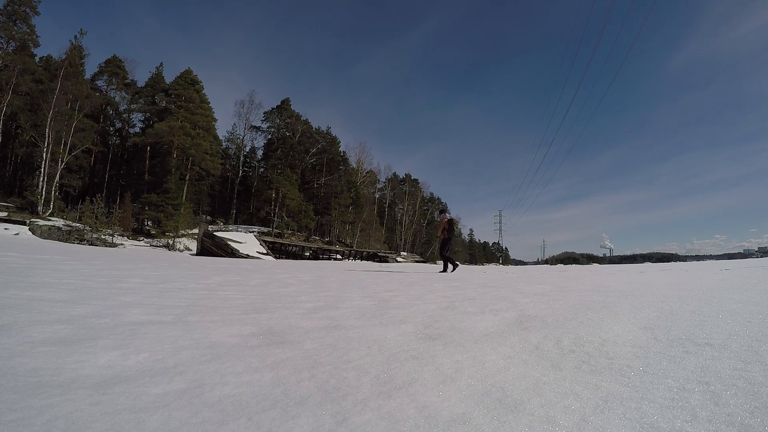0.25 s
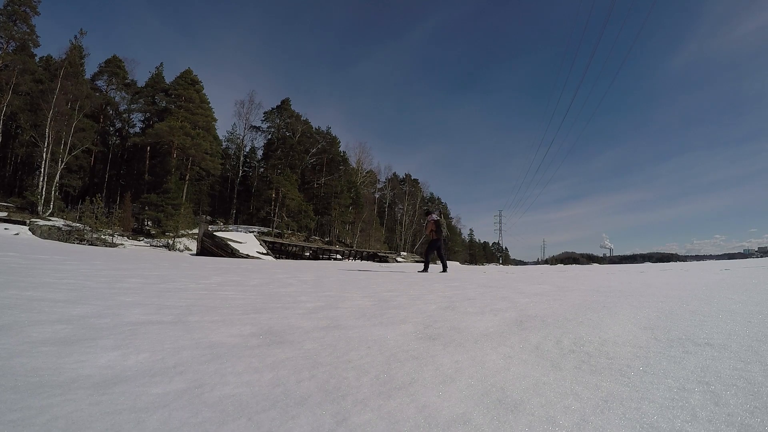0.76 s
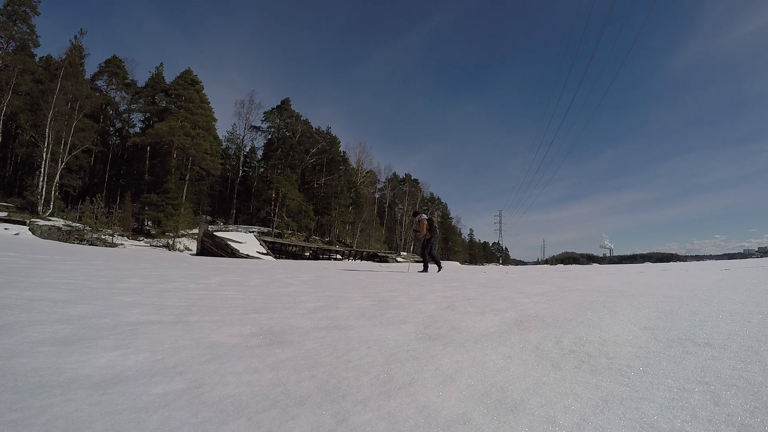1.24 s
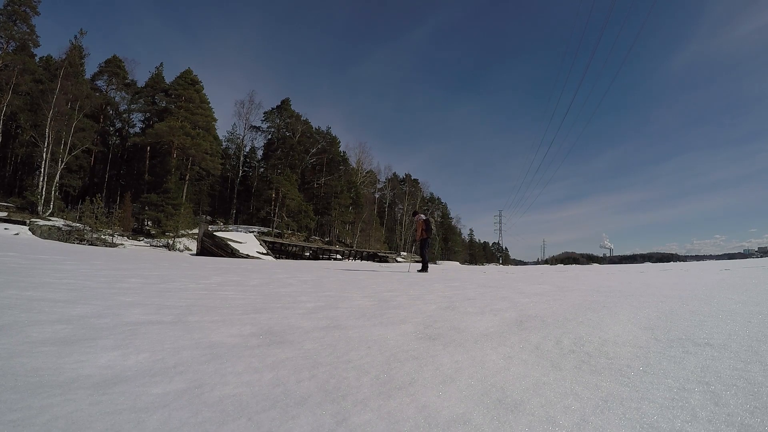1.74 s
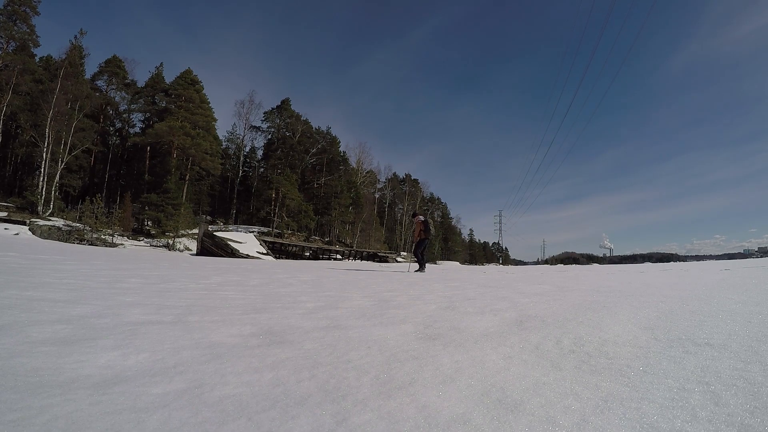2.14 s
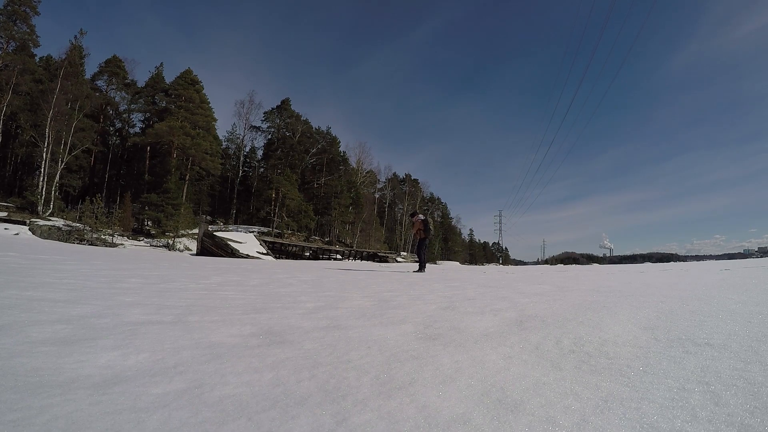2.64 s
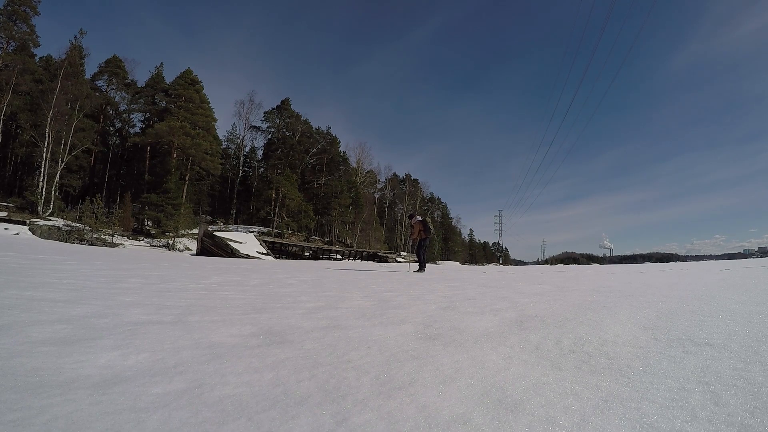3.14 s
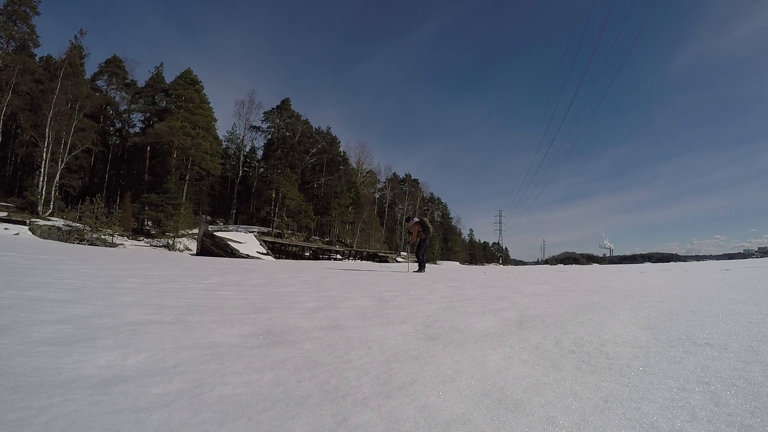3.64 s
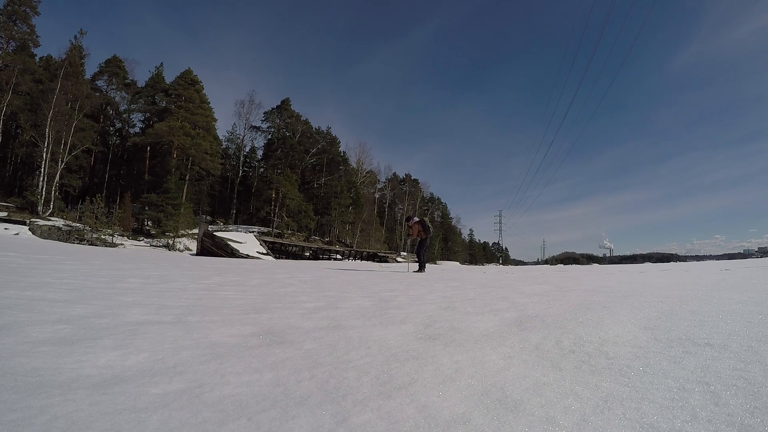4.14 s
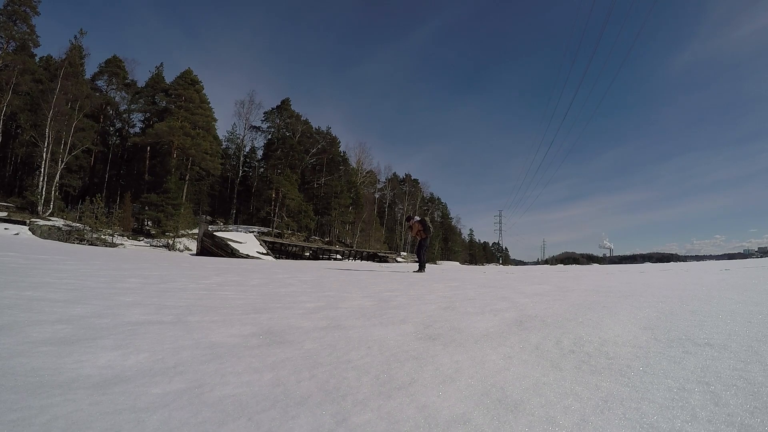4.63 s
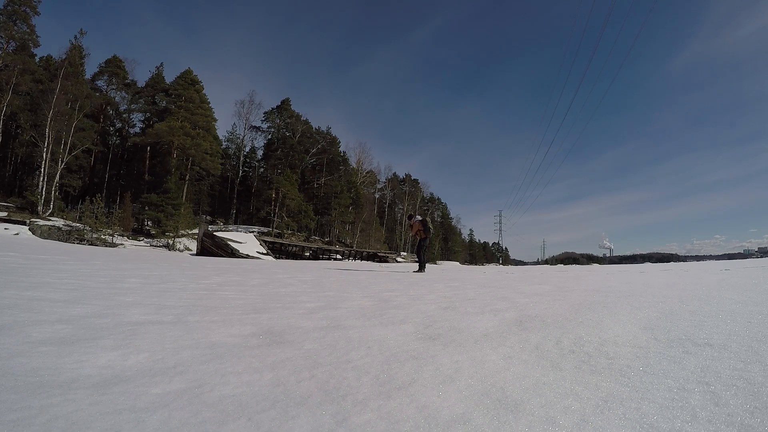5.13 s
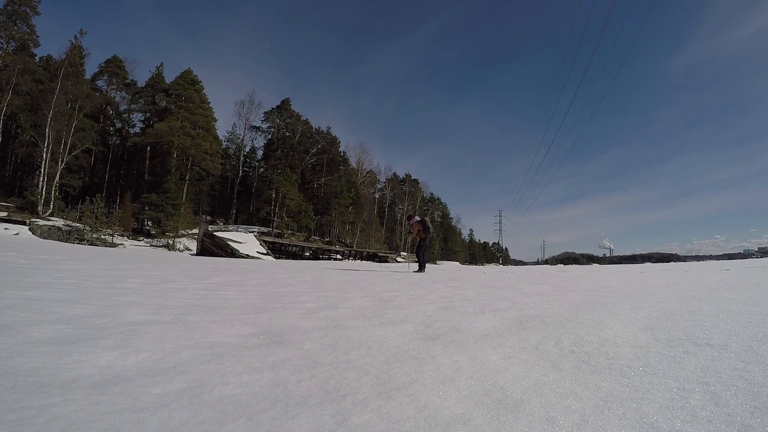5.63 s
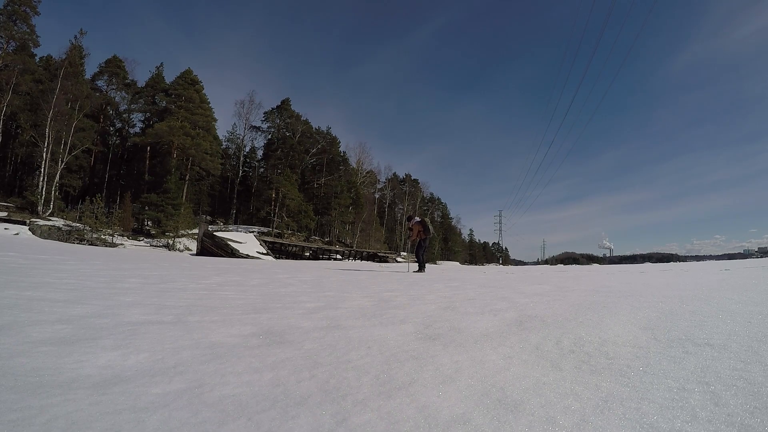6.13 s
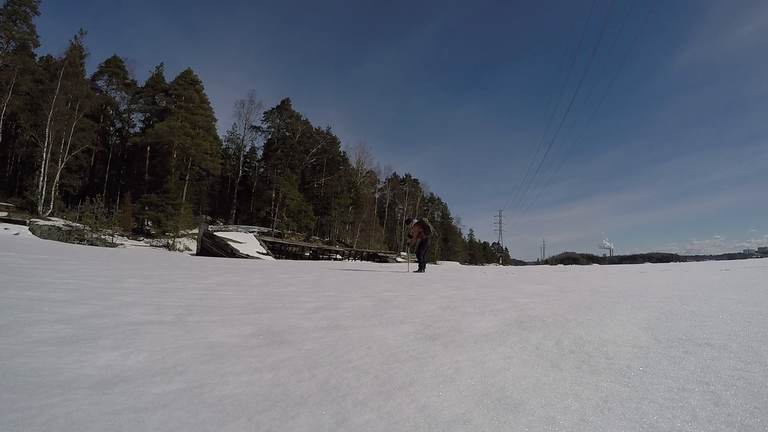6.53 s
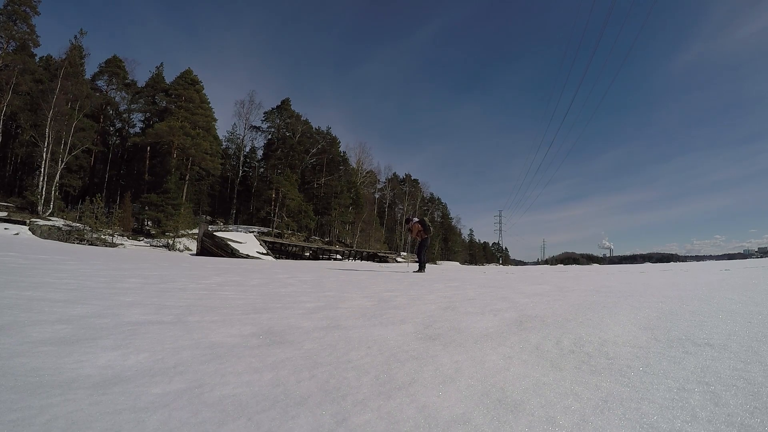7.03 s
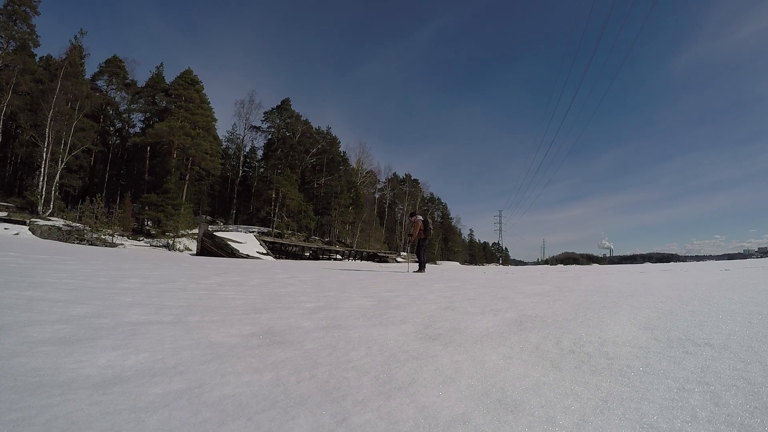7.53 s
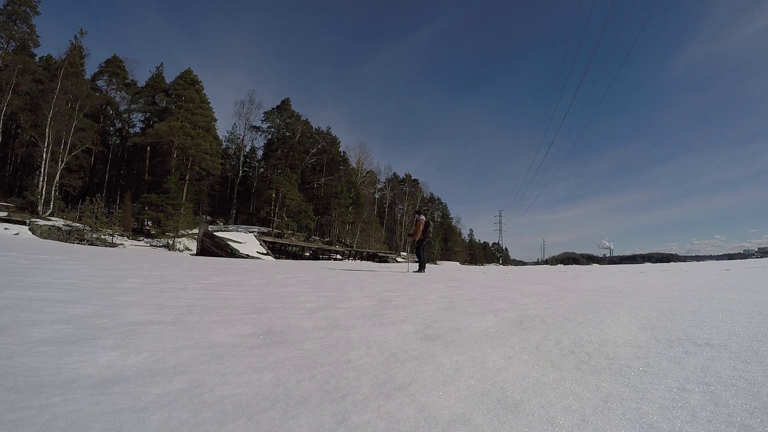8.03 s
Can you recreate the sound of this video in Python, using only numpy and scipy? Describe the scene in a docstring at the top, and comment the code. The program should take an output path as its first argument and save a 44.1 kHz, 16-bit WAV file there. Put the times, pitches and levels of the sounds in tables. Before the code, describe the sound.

A steel chisel cracks lake ice once, then in a regular run of eight bright chops with low thumps and soft echoes from forest and shore.

```python
"""On a frozen lake, boots step softly on snowy ice over faint wind and the thin hiss of the microphone.
Some way off, straight ahead, a long steel chisel strikes one blow; after two more steps comes a run of eight chops.
Each chop cracks crust, then hard ice: bursts of tiny snaps ring steel and ice, and a bending wave falls in pitch.
The shore and the forest return it as smeared echoes. A deep hum, a climbing sine, passes behind the early chops.
Near the end wind and hiss grow louder together; only the hiss is wide, all else is alike in both channels."""
import sys
import numpy as np
from scipy import signal
from scipy.fft import rfft, irfft, next_fast_len
from scipy.io import wavfile
from scipy.ndimage import uniform_filter1d, map_coordinates

SR = 44100
rng = np.random.default_rng(int(sys.argv[2]) if len(sys.argv) > 2 else 0)


def pcm_store(signal):
    """Save signal as 16-bit PCM."""
    levels = np.round(np.clip(np.atleast_2d(signal), -1, 1) * 32767)
    wavfile.write(sys.argv[1], SR, levels.astype(np.int16).T)


N = 364707
TIME = np.arange(N) / SR  # seconds
LEAD_S = 0.05  # from the start of a fracture burst to its height
TOP_HZ = 15300  # band limit


def amp(db):
    """Decibels to gain."""
    return 10 ** (np.asarray(db) / 20)


def unit(x):
    """Scale to rms 1."""
    return x / np.sqrt(np.mean(x ** 2) + 1e-20)


def along(points, hz):
    """(Hz, value) points joined by straight lines on a log frequency axis."""
    f, value = np.transpose(points)
    return np.interp(np.log(hz + 1), np.log(f + 1), value)


def wobble(rate):
    """A smooth random curve with rate knots a second."""
    knots = rng.standard_normal(int(N * rate / SR) + 4)
    return map_coordinates(knots, [TIME * rate])


def filtered(x, response):
    """x shaped by a response given as a function of frequency."""
    n = x.shape[-1]
    size = next_fast_len(2 * n)
    spectrum = rfft(x, size) * response(np.fft.rfftfreq(size, 1 / SR))
    return irfft(spectrum, size)[..., :n]


def causal(gain):
    """The minimum-phase response with this gain, which rings only after its cause."""
    cepstrum = irfft(np.log(np.maximum(gain, 1e-6)))
    half = len(cepstrum) // 2
    cepstrum[1:half] *= 2
    cepstrum[half + 1:] = 0
    return np.exp(rfft(cepstrum))


def resonances(modes, f):
    """Summed response of (Hz, width Hz, dB) resonances with alternating signs."""
    total = 0
    for k, (centre, width, db) in enumerate(modes):
        damping = 1j * f * width
        total = total + (-1) ** k * amp(db) * damping / (centre * centre - f * f + damping)
    return total


def noise(spectrum):
    """Steady noise of rms 1 coloured by (Hz, dB) points."""
    return unit(filtered(rng.standard_normal(N), lambda f: amp(along(spectrum, f))))


def add(track, s, x):
    """Mix x into track from time s in seconds."""
    i = max(round(s * SR), 0)
    track[i:i + len(x)] += x[:N - i]


def fracture(rise, decay, colour, grain_db=5.0, lead_in_db=-28, lead_in=0.01, even_hz=900):
    """A brief swarm of tiny snaps in the given colour: rms 1 at its height, LEAD_S in; times in seconds."""
    size = SR // 5
    t, f = np.arange(size) / SR - LEAD_S, np.fft.rfftfreq(size, 1 / SR)
    swarm = np.exp(-np.abs(t) / np.where(t < 0, rise, decay))
    # a faint build-up leads into each burst
    swarm += amp(lead_in_db) * np.exp(-np.abs(t) / lead_in) * (t < 0)
    grain = amp(grain_db * rng.standard_normal(size))
    snaps = rfft(swarm * rng.standard_normal(size) * grain)
    # the snaps share their energy evenly over broad bands, so the struck body sets the colour
    band_bins = max(int(even_hz / f[1]), 1)
    broad = np.sqrt(np.abs(uniform_filter1d(np.abs(snaps) ** 2, band_bins)))
    burst = irfft(snaps * causal(colour(f) * broad.mean() / broad))
    return burst * np.linalg.norm(swarm) / np.linalg.norm(burst)


# The chops, two bites each: through the crust, then into the hard ice. Each row: time in seconds,
# crack level in dB, decay in seconds, brightness in dB per octave, lower ring in Hz, upper ring in Hz, boom level in dB.
BITES = [(1.1681, -23, 0.0042, 2.5, 1320, 4770, -28), (1.1839, -28, 0.0068, -1, 1210, 3700, -23.5),
         (2.9751, -15.5, 0.0023, 1, 1580, 3630, -30.5), (2.990, -26, 0.003, 1, 1490, 3660, -18),
         (3.6403, -23, 0.0042, 2.5, 2280, 3820, -29), (3.6591, -23.5, 0.0033, 1.5, 2840, 3730, -17),
         (4.2807, -20, 0.0035, -0.5, 1220, 2430, -31.5), (4.2952, -21.5, 0.0033, 0.5, 1260, 4250, -21),
         (4.851, -25, 0.0056, .5, 2720, 4800, -31.5), (4.866, -21.5, 0.0045, -0.5, 1480, 2830, -22),
         (5.447, -26, 0.0034, 0, 2180, 2540, -50), (5.4636, -18, 0.0022, -1, 2140, 4000, -13),
         (6.0127, -21.5, 0.0045, 1, 2300, 3300, -36), (6.031, -23.5, 0.0037, 0.5, 2800, 4260, -15),
         (6.606, -43, .02, 2.5, 3400, 4330, -48), (6.628, -14, 0.0016, -2, 826, 1670, -10),
         (7.219, -39.5, 0.016, 2.5, 3230, 5000, -44), (7.235, -19, 0.005, 2.5, 2950, 4820, -9)]
# Ringing of blade and ice. Each row: resonance in Hz, width in Hz, middle level in dB.
BLADE = [(731, 47, -1.5), (1021, 66, 4.5), (1433, 69, -2), (2220, 130, 1.5), (2575, 335, 3.5),
         (3880, 420, -1), (4730, 750, -4.5), (5750, 330, -5.5), (6840, 360, -6.5), (8080, 320, -22),
         (9400, 170, -16), (11080, 120, -5.5), (13100, 91, -9)]
# Colour of shattering ice. Each row: frequency in Hz, relative level in dB per Hz.
SHATTER = [(150, -72), (350, -27), (580, -5), (900, -9.5), (1600, -0.5), (1950, -1.5), (2450, -11),
           (3200, -5), (4100, -15), (6200, -17.5), (8500, -23.5), (10500, -14), (13000, -27), (15500, -47)]
RISE_SHARE = 0.19  # a crack's rise over its decay
# crumbling round each crack: level relative to it, build-up and decay
GRIT_DB, GRIT_RISE_S, GRIT_DECAY_S = -21.5, 0.0048, 0.0053


def cracks(lift_db, ring_db, ring_octaves=0.13, scatter_db=2.5):
    """Each bite rings steel and ice amid crumbling grit; two rings per bite stand out by lift_db."""
    out = np.zeros(N)
    for s, db, decay, bright, lower_hz, upper_hz, _ in BITES:
        modes = [(hz, width, level + scatter_db * rng.standard_normal()) for hz, width, level in BLADE]

        def colour(f):
            def octaves(hz):
                return np.log2(np.maximum(f, 400) / hz)

            rings = sum(np.exp(-(octaves(hz) / ring_octaves) ** 2 / 2) for hz in (lower_hz, upper_hz))
            ringing = amp(ring_db) * np.abs(resonances(modes, f))
            body = np.hypot(amp(along(SHATTER, f)), ringing)
            return body * amp(bright * octaves(upper_hz) + lift_db * rings)

        crack = fracture(RISE_SHARE * decay, decay, colour)
        grit = fracture(GRIT_RISE_S, GRIT_DECAY_S, colour)
        add(out, s - LEAD_S, amp(db) * crack)
        add(out, s - LEAD_S, amp(db + GRIT_DB) * grit)
    return out


# the wave in the ice sets in this long before the crack, and crests this long after setting in
BOOM_AHEAD_S, BOOM_CREST_S = 0.01882, 0.015


def booms(extra_hz=500, coupled_hz=89, glide=0.00335, rise=0.0085, fade=0.01):
    """A bending wave runs ahead, highs first, so its pitch falls to the note that keeps pace with sound in air."""
    out, t = np.zeros(N), np.arange(SR // 10) / SR
    # the pitch starts extra_hz above the coupled note
    cycles = coupled_hz * t + extra_hz * glide * (1 - np.exp(-t / glide))
    swelling = np.exp(-((t - BOOM_CREST_S) / np.where(t < BOOM_CREST_S, rise, fade)) ** 2)
    onset = 1 - np.exp(-t / 0.00024)
    wave = -swelling * onset * np.cos(2 * np.pi * cycles)
    for s, *_, boom_db in BITES:
        add(out, s - BOOM_AHEAD_S, amp(boom_db) * wave)
    return out


# Dull knocks as the blade is stopped, one a chop. Each row: time in seconds, strength in dB, pitch in Hz.
KNOCKS = [(1.1692, -15.5, 130), (2.976, -20.5, 224), (3.645, -14.5, 217), (4.283, -38, 170),
          (4.856, -22, 285), (5.465, -25, 197), (6.016, -18.5, 238), (6.6282, -7.5, 204), (7.24, -10, 204)]
# Colour of the low crunch. Each row: frequency in Hz, relative level in dB per Hz.
THUD = [(60, -24), (150, 11), (260, 1.5), (450, -3), (700, -22), (1500, -65), (4000, -79)]
CRUNCH_DB = -35  # the same with every knock


def knocks(t60=0.033, attack=0.0043, crunch_rise=0.0034, crunch_decay=0.0096):
    """The stopped blade thumps the ice round the hole for a few cycles and crushes it with a low crunch."""
    out, t = np.zeros(N), np.arange(SR // 10) / SR
    for s, db, hz in KNOCKS:
        envelope = amp(db - 60 * t / t60) * (1 - np.exp(-t / attack))
        crunch = fracture(crunch_rise, crunch_decay, lambda f: amp(along(THUD, f)))
        add(out, s, -envelope * np.sin(2 * np.pi * hz * t))
        add(out, s - LEAD_S, amp(CRUNCH_DB) * crunch)
    return out


CHIRP_DB = -27  # relative to the first crack of the chop


def chirps(ahead=0.0205, start_hz=560, glide=0.0055, fade=0.0095):
    """The first touch of each chop sends a faint falling chirp through the sheet, just ahead of the boom."""
    out, t = np.zeros(N), np.arange(SR // 20) / SR
    cycles = start_hz * glide * (1 - np.exp(-t / glide))
    chirp = np.sin(2 * np.pi * cycles) * np.exp(-(t / fade) ** 2)
    for s, db, *_ in BITES[::2]:
        add(out, s - ahead, amp(db + CHIRP_DB) * chirp)
    return out


# Chips ticking on the crust. Each row: time in seconds, level in dB, decay in seconds.
CHIPS = [(0.699, -51, 0.0015), (1.249, -48.5, .003), (3.0094, -33.5, .0006), (3.679, -35.5, .0009),
         (4.316, -37.5, .0012), (4.3272, -43, .0009), (4.888, -33.5, 0.00063), (5.517, -44, .001),
         (6.062, -39.5, 0.0012), (6.66, -45, .0008), (7.343, -46.5, 0.014)]
# Colour of a chip. Each row: frequency in Hz, relative level in dB per Hz.
CHIP = [(300, -0.5), (1200, -0.5), (2500, -0.5), (4200, 1.5), (7000, -10.5), (10000, -17), (15000, -25)]


def chips(rise=0.0006):
    """Splinters tick on the crust as tiny fractures, mostly just after a chop."""
    out = np.zeros(N)
    for s, db, decay in CHIPS:
        tick = fracture(rise, decay, lambda f: amp(along(CHIP, f)))
        add(out, s - LEAD_S, amp(db) * tick)
    return out


def smear(x, spectrum, delay, spread):
    """Echo of x over random paths bunched round a delay in seconds, redrawn for every half second of x."""
    out, t = np.zeros(N), np.arange(1, SR // 2) / SR
    arrivals = np.exp(-(np.log(t / delay) / spread) ** 2 / 2)
    for i in range(0, N, SR // 2):
        part = x[i:i + SR // 2]
        paths = filtered(rng.standard_normal(len(t)), lambda f: amp(along(spectrum, f)))
        echo = signal.fftconvolve(part, arrivals * paths)
        # the echo carries the energy of its part
        add(out, i / SR, echo * np.linalg.norm(part) / (np.linalg.norm(echo) + 1e-12))
    return out


# What the shoreline sends back through the sheet. Each row: frequency in Hz, relative level in dB.
SHORE = [(35, -25), (70, -24), (97, -3.5), (122, -18), (170, -11), (300, -9), (700, -40)]


def shore(boom, near_db=-15, far_db=-28):
    """The boom comes back from the uneven shoreline as a drawn-out note, then as a faint rumble."""
    note = smear(boom, SHORE, delay=0.042, spread=0.62)
    rumble = smear(boom, SHORE, delay=0.1, spread=1.0)
    return amp(near_db) * note + amp(far_db) * rumble


# What the trees and the snow send back. Each row: frequency in Hz, relative level in dB.
FOREST = [(200, -13), (800, 5), (1700, 0), (2450, 1), (3200, 1), (4200, 2), (10000, 0)]


def forest(crack, trees_db=-25, snow_db=-30):
    """The snow field scatters a little of each chop early; the trunks return a soft, late smear."""
    snow = smear(crack, FOREST, delay=0.031, spread=0.84)
    trees = smear(crack, FOREST, delay=0.16, spread=0.41)
    return amp(snow_db) * snow + amp(trees_db) * trees


# Boots on the snow-covered ice. Each row: heel time in seconds, heel level in dB, sole level in dB.
STEPS = [(0.179, -44.5, -45.5), (.775, -40.5, -48), (1.94, -46.5, -44), (2.491, -51.5, -56)]
# Colour of a tread. Each row: frequency in Hz, relative level in dB per Hz.
TREAD = [(40, 3.5), (100, 8.5), (220, 1), (330, -15), (600, -59), (3000, -33), (9000, -47)]
ROLL_S, PRESS_S = 0.07, 0.016  # from heel to sole; spread of each press


def steps():
    """Boots press the snow, heel then sole, as bell-shaped swells of soft low noise."""
    def press(s):
        return np.exp(-((TIME - s) / PRESS_S) ** 2 / 2)

    weight = np.zeros(N)
    for s, heel_db, sole_db in STEPS:
        weight += amp(heel_db) * press(s) + amp(sole_db) * press(s + ROLL_S)
    return weight * noise(TREAD)


SWELL_S, SWELL_RISE_S = 6.79, 0.21  # when wind and hiss start to grow louder, and how long it takes


def swell():
    """The shared rise of wind and hiss: 0 at rest, 1 once they have grown louder."""
    return np.clip((TIME - SWELL_S) / SWELL_RISE_S, 0, 1)


# Colour of the wind. Each row: frequency in Hz, relative level in dB per Hz.
RUMBLE = [(10, -2), (22, 8), (42, -0.5), (65, -8), (105, -13.5), (160, -15.5), (240, -23), (340, -38),
          (600, -50.5)]
WIND_DB, WIND_SWELL_DB = -46.5, 3  # level at rest; what the shared rise adds


def wind(gust_db=1.24):
    """Light wind rumbles at the microphone in small gusts, and grows louder together with the hiss near the end."""
    level_db = WIND_DB + WIND_SWELL_DB * swell() + gust_db * wobble(7.8)
    return amp(level_db) * noise(RUMBLE)


DRONE_S, DRONE_LENGTH_S, DRONE_DB = 4.2, 0.59, -44  # its middle, half its length, rms level in the middle
DRONE_HZ, DRONE_RISE_HZ_PER_S = 37.8, 5  # pitch in the middle, and the climb


def drone():
    """A deep hum, perhaps a far engine, comes up for about a second as a slowly climbing sine."""
    t = TIME - DRONE_S
    level = amp(DRONE_DB) * np.exp(-(t / DRONE_LENGTH_S) ** 4)
    cycles = np.cumsum(DRONE_HZ + DRONE_RISE_HZ_PER_S * t) / SR
    return level * np.sqrt(2) * np.sin(2 * np.pi * cycles)


# Colour of the hiss. Each row: frequency in Hz, relative level in dB per Hz.
HISS = [(100, 17.5), (350, 7), (850, 7), (1300, 1), (2200, 0), (4500, 0), (7000, -2), (14000, -1),
        (15300, -5.5)]
# Thin tones in the hiss. Each row: frequency in Hz, width in Hz, relative level in dB.
WHINE = [(5040, 124, -4), (10130, 110, -4), (13670, 60, -13), (15310, 230, 0.5)]
# How alike left and right are. Each row: frequency in Hz, likeness where 1 is identical.
ALIKE = [(100, 1), (700, 0.93), (2000, 0.71), (6000, 0.43), (15000, 0.47)]
AIR_DB, AIR_SWELL_DB = -58.5, 4.5  # level at rest; what the shared rise adds


def hiss(whine_db=-9, line_db=-19):
    """Far air and the microphone's own hiss, wide in the highs, with a thin whine; louder near the end."""
    def turn(f):
        return np.arccos(np.clip(along(ALIKE, f), -1, 1)) / 2

    mid = filtered(noise(HISS), lambda f: np.cos(turn(f)))
    side = filtered(noise(HISS), lambda f: np.sin(turn(f)))
    whine = unit(filtered(rng.standard_normal(N), lambda f: resonances(WHINE, f)))
    # the lowest whine has an even core whose pitch jitters quickly
    core_hz = WHINE[0][0] + 32 * wobble(200)
    core = unit(np.sin(2 * np.pi * np.cumsum(core_hz) / SR))
    wide = np.array([mid + side, mid - side])
    return amp(AIR_DB + AIR_SWELL_DB * swell()) * (wide + amp(whine_db) * whine + amp(line_db) * core)


def scene():
    """The chopping lies straight ahead; what spreads to the trees rings less than what comes direct."""
    direct = cracks(lift_db=8, ring_db=2.5)
    spreading = cracks(lift_db=3.5, ring_db=-6.5)
    boom = booms()
    through_air = direct + forest(spreading) + chips()
    through_ice = chirps() + boom + shore(boom) + knocks()
    return through_air + through_ice + steps() + wind() + drone() + hiss()


def record(dry):
    """Nothing is kept above the band limit."""
    return filtered(dry, lambda f: f < TOP_HZ)


dry = scene()
out = record(dry)
pcm_store(out)
```